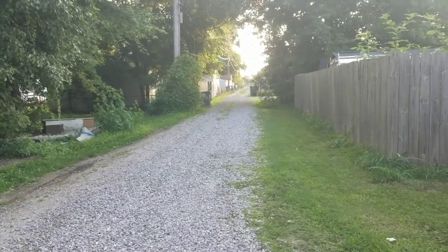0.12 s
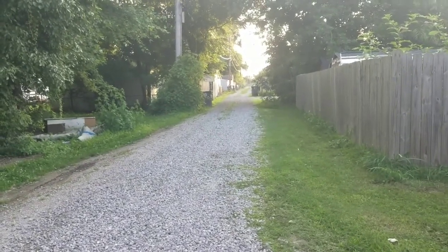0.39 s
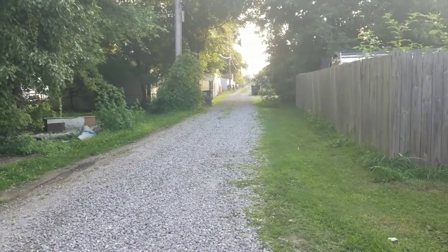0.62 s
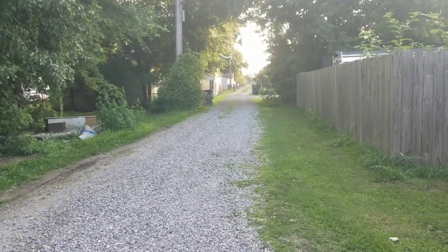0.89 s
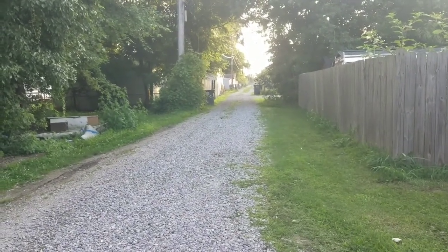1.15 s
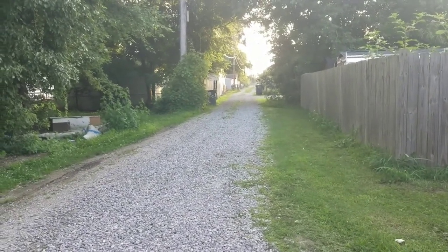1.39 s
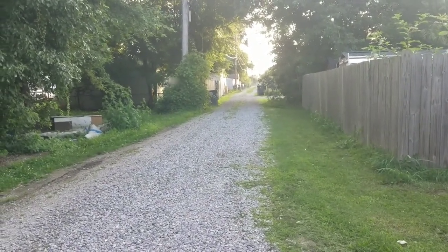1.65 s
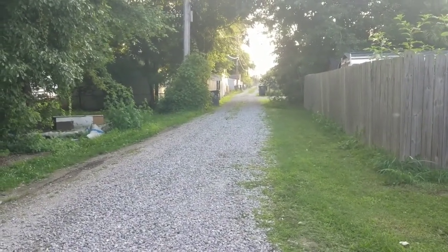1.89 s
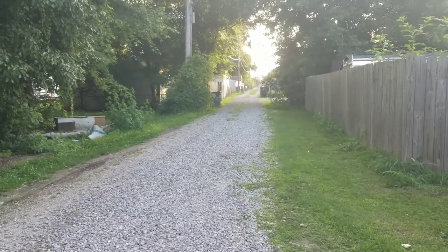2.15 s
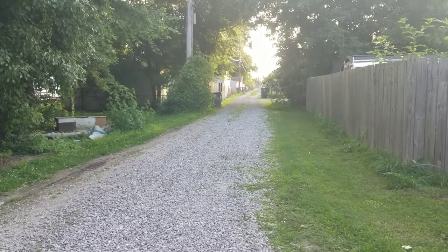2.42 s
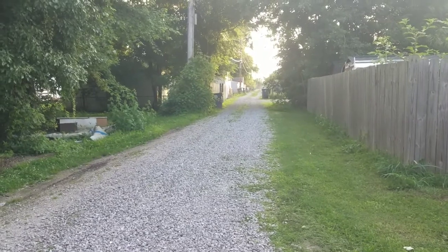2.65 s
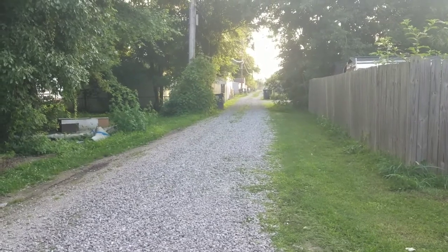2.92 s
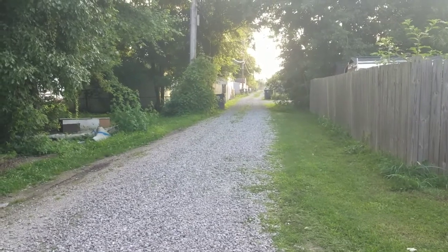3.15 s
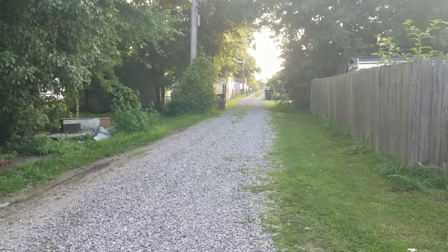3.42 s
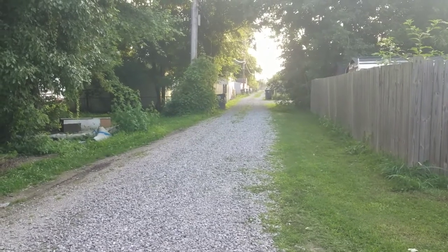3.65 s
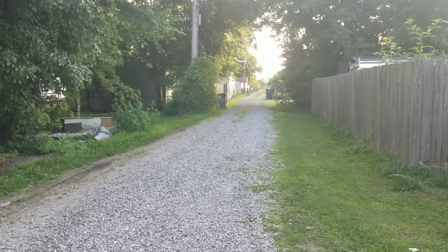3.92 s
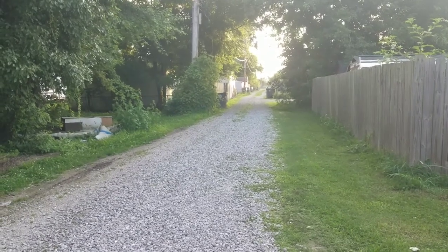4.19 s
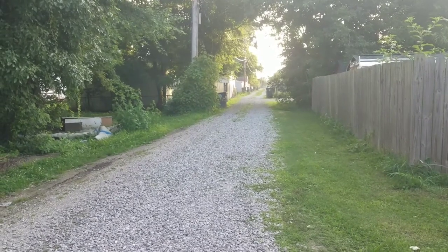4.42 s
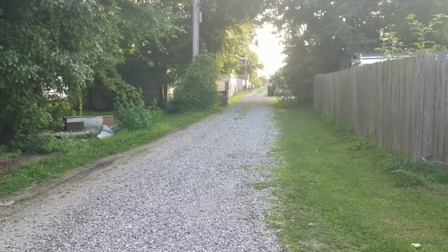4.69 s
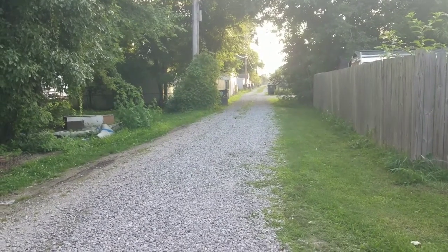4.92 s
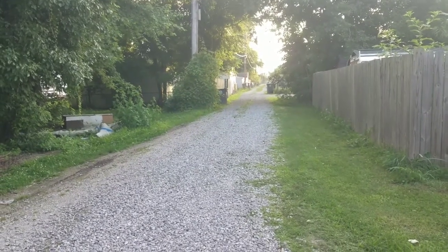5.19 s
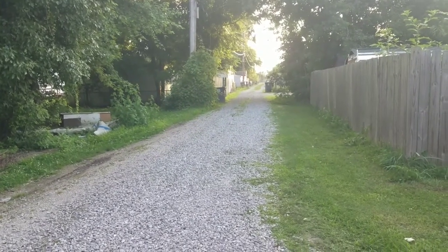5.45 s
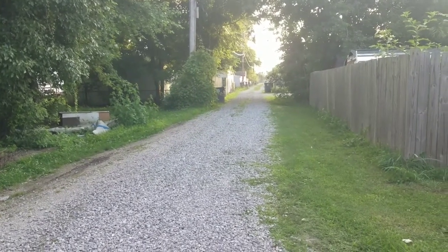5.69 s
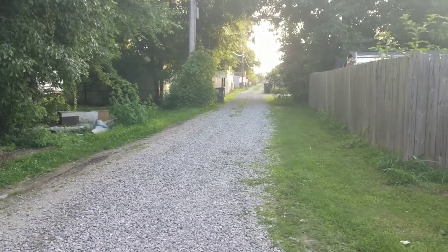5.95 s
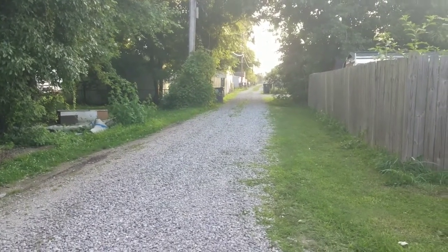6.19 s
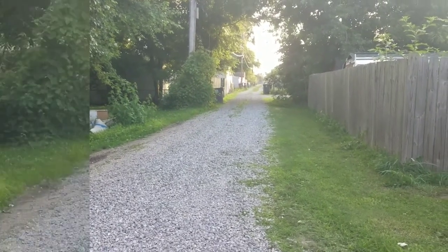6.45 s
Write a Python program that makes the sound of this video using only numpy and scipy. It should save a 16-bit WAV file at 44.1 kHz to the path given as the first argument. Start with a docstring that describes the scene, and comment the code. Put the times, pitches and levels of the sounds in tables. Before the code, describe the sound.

A distant small motor sputters and blips continuously, blurred by trees and a wooden fence, with a few harder pops early on. Faint steady neighbourhood hum lies beneath. First come evenly repeated downward bird chirps, mostly to the right, then irregular brief sweet notes from another bird. At about five and a half seconds, very close handling knocks jump out far louder than everything else, then the quiet alley continues.

```python
"""Putting engine and birds in a gravel alley

A small single-cylinder engine putters far down an alley: noise bursts and clicks ring pipe resonances.
One bird repeats a falling whistle, another sings short notes: bending sines with scattered echoes.
Shaped noise and wavering tones make the neighbourhood's hum; fingers knock and rub the recorder's
casing, as clicks into ringing modes and patchy noise. The body shades the left microphone."""
import sys
import numpy as np
from scipy import signal
from scipy.fft import rfft, irfft
from scipy.io import wavfile

SR = 44100
rng = np.random.default_rng(int(sys.argv[2]) if len(sys.argv) > 2 else 0)


def gain_from_decibels(decibels):
    """Convert decibel values to linear amplitude factors."""
    exponent = np.asarray(decibels, float) / 20
    return 10 ** exponent


def digitize_waveform(pressure):
    """Quantize a signal to 16-bit integers and store it at the path in sys.argv[1].

    Rows of a 2-D input are taken as channels; values are limited to [-1, 1].
    """
    field = np.atleast_2d(pressure).T
    bounded = np.clip(field, -1, 1)
    quanta = np.round(bounded * 32767).astype(np.int16)
    wavfile.write(sys.argv[1], SR, quanta)


N = 290174
TIME = np.arange(N) / SR
HZ = np.maximum(np.fft.rfftfreq(N, 1 / SR), 1)


def rms_one(x):
    """Scale to unit rms."""
    return x / np.sqrt(np.mean(x ** 2) + 1e-20)


def columns(rows, at):
    """Columns of a table joined by straight lines."""
    first, *rest = np.transpose(rows)
    return [np.interp(at, first, c) for c in rest]


def by_hz(rows):
    """Columns of a table over the spectrum, on a log-frequency axis."""
    return columns([(np.log(hz), *rest) for hz, *rest in rows], np.log(HZ))


def drift(rate):
    """Random wander of spread about 1, with rate turning points a second until its 400 run out."""
    knots = rng.standard_normal(400)
    return np.interp(TIME * rate, np.arange(400), knots) * 1.2


def resonance(x, hz, width):
    """Two-pole band with gain about 1 on top."""
    r = np.exp(-np.pi * width / SR)
    feedback = [1, -2 * r * np.cos(2 * np.pi * hz / SR), r * r]
    return signal.lfilter([(1 - r * r) / 2, 0, (r * r - 1) / 2], feedback, x)


def microphones(near, other):
    """Right hears one wavefront; left hears it shaded, shifted and mixed with an unrelated one."""
    # left microphone against right: (frequency [Hz], level [dB], likeness [0-1], phase lead [radians])
    shade = [(60, -3.5, 0.92, 1), (130, -4.5, 0.95, 0), (290, -5.5, 0.86, 0), (630, -6, 0.5, 0),
             (1280, -4, 0.3, 3.5), (1695, -9, 0.88, 2), (2500, -16, 0.13, 8), (4330, -10, 0.12, 6),
             (7400, -8.5, 0.8, 4.5), (7800, 5.5, 0.2, 21), (14100, 8.5, 0.7, -3)]
    level_db, alike, lead = by_hz(shade)
    alike = np.clip(alike, 0, 1)
    shared = alike * np.exp(1j * lead) * rfft(near)
    unrelated = np.sqrt(1 - alike ** 2) * rfft(other)
    left = gain_from_decibels(level_db) * (shared + unrelated)
    return np.array([irfft(left, N), near])


def coloured_noise(spectrum):
    """Two unrelated noises of one colour, rms 1 overall."""
    white = rng.standard_normal((2, N))
    return rms_one(irfft(rfft(white) * gain_from_decibels(by_hz(spectrum)[0]), N))


def foliage(x, t60, wet_db, rise_s=.0034):
    """Dense scattered echoes from trees and fence, other ones in each channel."""
    t = np.arange(SR // 2) / SR
    tail = rng.standard_normal((2, len(t))) * gain_from_decibels(-60 * t / t60) * np.clip(t / rise_s, 0, 1)
    tail = tail / np.sqrt(np.sum(tail ** 2, axis=1, keepdims=True))
    return gain_from_decibels(wet_db) * signal.fftconvolve(x[None], tail, axes=1)[:, :N]


def engine(burst_s=.0035, uneven_db=1.5, throb_db=2.5):
    """Each firing spits a short burst of gas noise through the exhaust resonances."""
    # engine speed as the throttle is blipped: (time [s], rate [firings per s])
    speed = [(0, 30.51), (1.1, 28.36), (1.27, 32.31), (1.38, 33.83), (1.7, 29.79), (2.09, 30.08),
             (2.38, 31.47), (2.66, 31.28), (3.22, 36.27), (3.62, 29.65), (3.88, 31.81), (4.39, 33.38),
             (4.62, 35.83), (5.04, 31.02), (5.37, 35.61), (5.71, 33.22), (5.96, 36.92), (6.19, 31.99),
             (6.58, 28.57)]
    # exhaust resonances: (frequency [Hz], width of the narrower pass [Hz], relative level [dB])
    exhaust = [(625, 160, -4), (1350, 400, -1.5), (1660, 140, -10), (2500, 130, 7), (2900, 150, 6),
               (3270, 86, 3), (3700, 140, -1.5), (4305, 180, -1.5), (4830, 200, -5.5), (5440, 140, 3.5),
               (6020, 270, -3.5), (6540, 104, -1), (9740, 2000, -20.5)]
    # low pipe resonances, rung cleanly by each firing: (frequency [Hz], width per pass [Hz], relative level [dB])
    pipe = [(337.7, 72, 0), (600, 61, 0.5), (827, 58, -4)]
    # level of the exhaust pops, jumping when the throttle opens: (time [s], level [dB])
    pops = [(0, -56.5), (.6, -57.5), (1.05, -62), (1.2, -66), (1.35, -55.5), (1.55, -62.5), (1.8, -64),
            (2.4, -64.5), (2.7, -66), (3.55, -66.5), (3.9, -71.5), (4.4, -69.5), (4.62, -63), (4.76, -60.5),
            (4.95, -73.5), (5.38, -58), (5.7, -68), (5.85, -50.5), (6.0, -55.5), (6.15, -67.5),
            (6.58, -65.5)]
    # slow change of the path down the alley:
    # (time [s], treble rasp over the pops [dB], smeared roar at middling pops [dB])
    path = [(0, -23, -57.5), (.75, -17.5, -57.5), (1.2, -15, -58.5), (1.9, -7.5, -55.5), (2.8, -9, -52),
            (3.6, -9, -58.5), (4.5, -8.5, -56.5), (5.5, -12, -59), (6.58, -17.5, -60.5)]
    # roar after many leaf and fence echoes: (frequency [Hz], relative density [dB per Hz])
    roar_colour = [(900, -25), (1500, -13.5), (1950, -9.5), (2400, 0.5), (2850, 0.5), (3350, -11.5),
                   (3800, -7.5), (5000, -12.5), (7000, -26), (9000, -55)]
    first_turn, rasp_from_hz, middling_pops_db = .87, 5200, -62
    thump_db, thump_follows_pops = -67.5, 0.18   # level at middling pops; share of their dB swing
    roar_follows_pops = 0.51   # share of the pops' dB swing
    patches_hz, patchy_db = [2200, 2700, 3300, 4200], 2.3   # parts of the roar that swell on their own

    per_s = columns(speed, TIME)[0]
    turns = first_turn + np.cumsum(per_s) / SR
    pops_db = columns(pops, TIME)[0]
    pops_swing_db = pops_db - middling_pops_db
    rasp_db, roar_db = columns(path, TIME)
    roar_db = roar_db + roar_follows_pops * pops_swing_db

    firing = turns.astype(int)
    luck = rng.standard_normal((300, 2))   # strength and lateness of each firing
    late_s = .0005 * np.abs(luck[firing, 1])   # ignition comes a little late at random
    since = (turns % 1) / per_s - late_s
    strength = gain_from_decibels(uneven_db * luck[firing, 0])
    burst = (since > 0) * np.exp(-np.abs(since) / burst_s) * strength
    opens = np.diff(since > 0, prepend=True) & (since > 0)
    crack = 3.5 * strength * opens   # the valve opens with a snap
    gas = crack + burst * rng.standard_normal((2, N))

    rings = {}
    for hz, width, db in exhaust:
        rings[hz] = gain_from_decibels(db) * resonance(resonance(gas, hz, width), hz, 2 * width)
    bark = rms_one(sum(ring for hz, ring in rings.items() if hz < rasp_from_hz))
    rasp = rms_one(sum(ring for hz, ring in rings.items() if hz > rasp_from_hz))
    popping = gain_from_decibels(pops_db) * (bark + gain_from_decibels(rasp_db) * rasp)

    click = crack + 1e-18
    thump = rms_one(sum(gain_from_decibels(db) * resonance(resonance(click, hz, width), hz, width)
                        for hz, width, db in pipe))
    thump = gain_from_decibels(thump_db + thump_follows_pops * pops_swing_db + 2.04 * drift(2.6)) * thump

    # echoes smear the pops to a roar that only faintly throbs with the firings
    throb = throb_db * np.cos(2 * np.pi * (turns - .2))
    roar = coloured_noise(roar_colour) * gain_from_decibels(throb + 1.5 * drift(12))
    roar = roar + sum((gain_from_decibels(patchy_db * drift(5)) - 1) * resonance(roar, hz, 540) for hz in patches_hz)
    return microphones(*(popping + gain_from_decibels(roar_db) * roar + thump))


def neighbourhood():
    """Far traffic and leaves as smooth noise, with a few wavering machine tones."""
    # slow swell of the air noise: (time [s], level [dB])
    swell = [(0, -54.5), (3.3, -54), (4.4, -54), (4.6, -52), (5.1, -54), (6.2, -50.5), (6.58, -51.5)]
    # colour of the air noise: (frequency [Hz], relative density [dB per Hz])
    air_colour = [(20, -23), (40, -10), (80, -6.5), (125, -1), (200, -4), (330, -5), (500, -7), (800, -6),
                  (1100, -7), (1500, -7.5), (2000, -8), (3000, -12.5), (5000, -27), (7000, -29),
                  (9000, -85)]
    # steady machinery hum, narrow noise: (frequency [Hz], width per pass [Hz], level [dB])
    machines = [(120.1, 22, -64), (141.4, 12, -72), (475, 2.6, -75), (1404, 17.5, -68.5)]
    air = gain_from_decibels(columns(swell, TIME)[0] + 0.077 * drift(7.7)) * coloured_noise(air_colour)
    white = rng.standard_normal((2, N))
    hum = sum(gain_from_decibels(db) * rms_one(resonance(resonance(white, hz, width), hz, width))
              for hz, width, db in machines)
    return microphones(*(air + hum))


def falling_whistle():
    """The same downward sweep again and again; leaves hide the direct sound of its high start."""
    # shape of one fall: (time from the repeat's time [s], pitch [Hz], relative level [dB])
    fall = [(-.02, 5516, -19), (-.008, 5152, -7), (.021, 4150, -4), (.037, 3563, 2.5), (.049, 2985, 0.5),
            (.059, 2500, 0.5), (.068, 2150, -1.5), (.08, 2088, -11), (.09, 1990, -36)]
    # repeats: (time [s], level added to the shape [dB])
    falls = [(0.662, -57), (0.936, -53.5), (1.211, -50.5), (1.482, -51), (1.757, -49), (2.03, -49.5),
             (2.31, -49.5), (2.582, -48.5), (2.862, -50.5)]
    ground_echo_s, ground_echo_share = .002, .6
    fence_echo_s, fence_echo_db = 0.037, -10.5

    song = np.zeros(N)
    for start, level_db in falls:
        hz, db = columns(fall, TIME - start)
        on = (TIME > start + fall[0][0]) & (TIME < start + fall[-1][0])
        song += on * gain_from_decibels(db + level_db) * np.sqrt(2) * np.sin(2 * np.pi * np.cumsum(hz) / SR)

    direct = signal.lfilter(*signal.butter(8, 3450, fs=SR), song)
    # the gravel's echo beads the sweep
    direct = direct + ground_echo_share * np.interp(TIME - ground_echo_s, TIME, direct)
    direct = direct * gain_from_decibels(2.2 * drift(70))
    # one clear echo off the planks
    direct = direct + gain_from_decibels(fence_echo_db) * np.interp(TIME - fence_echo_s, TIME, direct)
    scattered = song - .6 * resonance(song, 3350, 500)
    echoes = foliage(scattered, t60=.62, wet_db=2.0, rise_s=.013) * gain_from_decibels([[-12.0], [0]])
    return direct * gain_from_decibels([[-12.0], [-4.0]]) + echoes


def bangs(puff_s=.0025):
    """A few firings crack harder: an abrupt puff of gas noise through broad resonances."""
    # hard firings: (time [s], strength of the puff before its resonances [dB])
    hard_firings = [(1.3505, -27), (1.3795, -29), (1.409, -35), (1.439, -31)]
    # what a bang rings beyond the exhaust: (frequency [Hz], width of the narrower pass [Hz], gain [dB])
    body = [(600, 280, -1), (1360, 400, 0), (2680, 630, -3), (4900, 820, -10), (10000, 2500, -29.5)]
    gate = sum(gain_from_decibels(db) * (TIME > s) * np.exp(-np.abs(TIME - s) / puff_s) for s, db in hard_firings)
    puff = gate * rng.standard_normal((2, N))
    return microphones(*sum(gain_from_decibels(db) * resonance(resonance(puff, hz, width), hz, 2 * width)
                            for hz, width, db in body))


def song_notes():
    """Near sines bending through three pitches, with quickly faded ends and a slight tremble."""
    # notes: (time [s], length [s], start [Hz], middle [Hz], end [Hz], level at the mean pitch [dB])
    notes = [(2.401, 0.055, 2790, 2800, 2700, -66), (2.47, 0.07, 2560, 2520, 2600, -66),
             (2.872, 0.11, 2580, 2600, 2710, -67), (3.288, 0.022, 2620, 2540, 2510, -61),
             (3.311, 0.024, 2350, 2200, 2100, -61), (3.39, 0.044, 2600, 2380, 2160, -64),
             (3.508, .018, 3100, 3000, 2950, -72), (3.528, 0.047, 2870, 2790, 2740, -62),
             (3.691, .016, 4300, 4020, 3700, -70), (3.725, 0.025, 3900, 3900, 3820, -72),
             (3.74, .018, 2950, 3120, 3250, -72), (3.767, .016, 3220, 2960, 2750, -68),
             (3.792, 0.02, 3400, 3380, 3270, -70), (3.811, .018, 3050, 2920, 2860, -65),
             (3.867, 0.016, 2950, 2980, 2950, -69), (3.974, 0.15, 2150, 2505, 2220, -60.5),
             (3.99, 0.013, 4700, 4670, 4660, -66.5), (4.537, 0.037, 2670, 2320, 2210, -64.5),
             (4.642, 0.11, 2387, 2625, 2710, -60), (5.123, 0.054, 3060, 2600, 2350, -68),
             (5.188, .035, 3020, 2950, 2750, -65), (5.678, 0.108, 2300, 2274, 2320, -61.5),
             (5.772, 0.048, 2900, 2600, 2260, -68), (5.842, 0.071, 2200, 2280, 2390, -66),
             (6.359, 0.022, 2660, 2900, 3220, -69)]
    louder_db_per_octave = 22   # within a note, higher is louder
    pan_db = -12   # direct sound, left minus right
    song = np.zeros(N)
    for start, length, first_hz, middle_hz, last_hz, db in notes:
        at = round(start * SR)
        u = np.linspace(0, 1, round(length * SR))
        hz = np.polyval(np.polyfit([0, .5, 1], [first_hz, middle_hz, last_hz], 2), u)
        level = gain_from_decibels(db + louder_db_per_octave * np.log2(hz / hz.mean()))
        ends = np.sin(np.pi * u) ** 0.084
        tone = np.sqrt(2) * np.sin(2 * np.pi * np.cumsum(hz) / SR)
        song[at:at + len(u)] += level * ends * tone
    song = song * gain_from_decibels(1.2 * drift(55))
    echoes = foliage(song, t60=0.23, wet_db=-3.0) * gain_from_decibels([[-6.0], [0]])
    return song * gain_from_decibels([[pan_db / 2], [-pan_db / 2]]) + echoes


def knocks(left_lag_s=0.000386):
    """A low-passed click rings the casing modes, which each microphone feels differently."""
    # finger knocks: (time [s], strength [dB], contact sharpness as low-pass corner [Hz],
    # direction [+1 pull, -1 push], low pitch that the spot favours [Hz])
    taps = [(5.087, -36.5, 700, -1, 400), (5.364, -36.5, 700, -1, 600), (5.5321, -25, 3500, 1, 422),
            (5.596, -43, 6000, -1, 400), (5.598, -32.5, 900, -1, 350), (5.6156, -29.5, 6100, -1, 313),
            (5.6185, -8.5, 3300, -1, 290), (5.6197, -14.5, 2700, 1, 290), (5.6517, -26, 6000, 1, 425),
            (5.656, -30, 2800, -1, 420), (5.8577, -27.5, 1420, -1, 540)]
    # casing modes: (frequency [Hz], t60 [s], relative level at right [dB], relative level at left [dB],
    # signed factor on the left)
    casing = [(75, 0.08, -19, -20, 1), (220, 0.096, -17, -20, 1), (275, 0.039, -19, -5.5, 0.61),
              (367, 0.021, 2.5, -2.5, -1.4), (548, 0.028, -5, -1.5, 0.74), (895, 0.018, -11.5, -14, 0.9),
              (967, 0.027, -11.5, -17, 0.31), (1350, 0.0043, -8, -0.5, -0.89),
              (1695, 0.0082, 2, -9.5, 0.73), (2600, 0.006, 3.5, -11, -0.78), (3860, 0.0033, 5, -12, 0.48),
              (5760, 0.002, -9, -18, -0.14), (7000, 0.0037, -15, -30, 0.69), (9970, 0.005, 6.5, 2, 0.51),
              (11000, 0.0039, -16, 5, 0.77), (13500, 0.002, -16, -14, 0.14)]
    out, length = np.zeros((2, N)), 4096
    for start, db, sharp_hz, direction, spot_hz in taps:
        t = np.maximum(np.arange(length) / SR - [[left_lag_s], [0]], 0)
        ringing = 0
        for hz, t60, right_db, left_db, sign in casing:
            # octaves between a panel mode and the favoured pitch, each costing 20 dB
            away = abs(np.log2(hz / spot_hz)) * (200 < hz < 700)
            share = gain_from_decibels([[left_db], [right_db]]) * gain_from_decibels(-20.0 * away) * [[sign], [1]]
            ringing = ringing + share * gain_from_decibels(-60 * t / t60) * np.sin(2 * np.pi * hz * t)
        contact = signal.butter(2, min(sharp_hz, .4 * SR), fs=SR)
        at = round(start * SR)
        out[:, at:at + length] += np.sign(direction) * gain_from_decibels(db) * signal.lfilter(*contact, ringing)
    # the knocks carry no slow push below about 135 Hz
    return signal.lfilter(*signal.butter(2, 135, "high", fs=SR), out)


def rubbing():
    """Fingers slide on the casing: patchy friction noise around the main knocks, weaker at the left."""
    # friction: (time [s], level before patchiness and left cut [dB])
    rub = [(5.585, -79), (5.6, -53), (5.612, -52), (5.625, -49), (5.645, -49), (5.66, -52), (5.68, -64)]
    # colour of the friction: (frequency [Hz], relative density [dB per Hz])
    rub_colour = [(50, -23), (160, -9), (300, -7), (1000, -6.5), (3000, -12.5), (6500, -20.5), (8000, -59),
                  (11000, -51), (14500, -55), (15000, -70)]
    level_db = columns(rub, TIME)[0] + 3.0 * drift(50)
    return gain_from_decibels(level_db) * coloured_noise(rub_colour) * gain_from_decibels([[-5.0], [0]])


def scene():
    """All sources at the two microphones."""
    far = engine() + neighbourhood() + bangs()
    birds = falling_whistle() + song_notes()
    return far + birds + knocks() + rubbing()


def roll_off(x):
    """The treble ends steeply here."""
    return signal.sosfilt(signal.butter(12, 15480, fs=SR, output="sos"), x)


def record(dry):
    """Swings beyond the recorder's limit clip, the top is cut and microphone self-noise joins in."""
    # colour of the self-noise: (frequency [Hz], relative density [dB per Hz])
    hiss_colour = [(5000, -12), (8000, -7), (9800, -4), (11000, -4), (12500, -1), (14480, 0.5),
                   (14560, -68)]
    overload, hiss_db = 0.7, -74   # highest swing taken [full scale = 1]; self-noise level
    clipped = np.clip(dry, -overload, overload)
    top_cut = signal.cheby2(8, 30, 14900, fs=SR, output="sos")
    taken = signal.sosfilt(top_cut, clipped)
    return roll_off(taken + gain_from_decibels(hiss_db) * coloured_noise(hiss_colour))


dry = scene()
out = record(dry)
digitize_waveform(out)
```